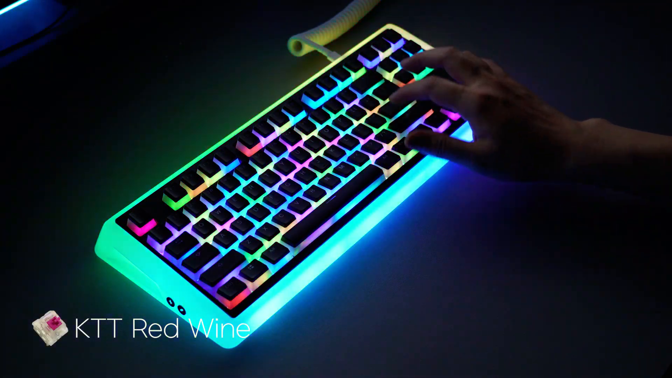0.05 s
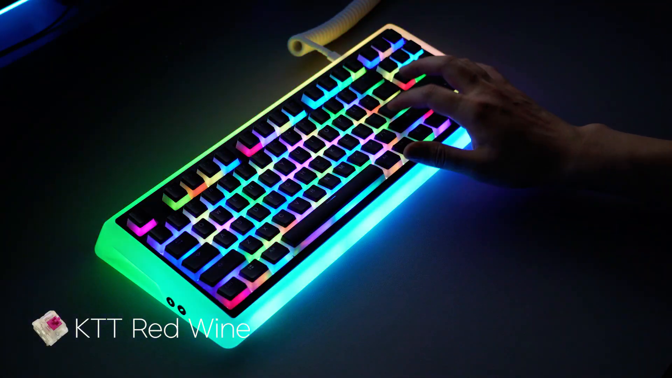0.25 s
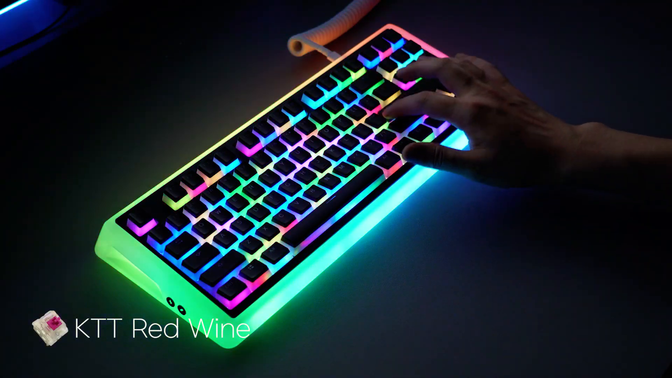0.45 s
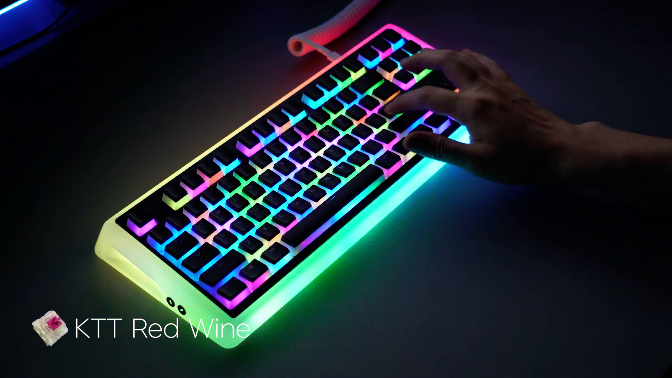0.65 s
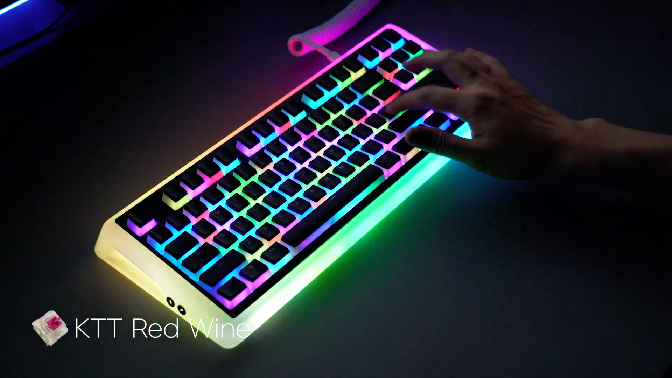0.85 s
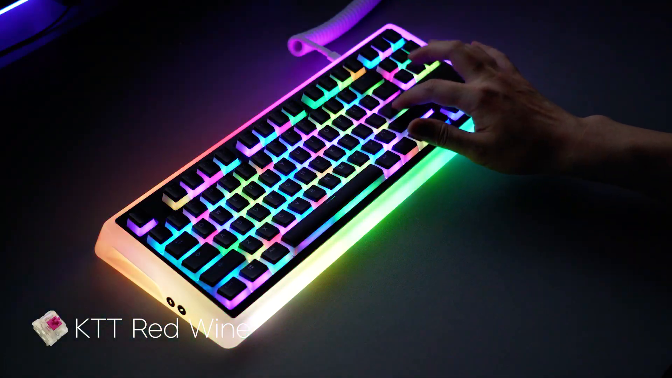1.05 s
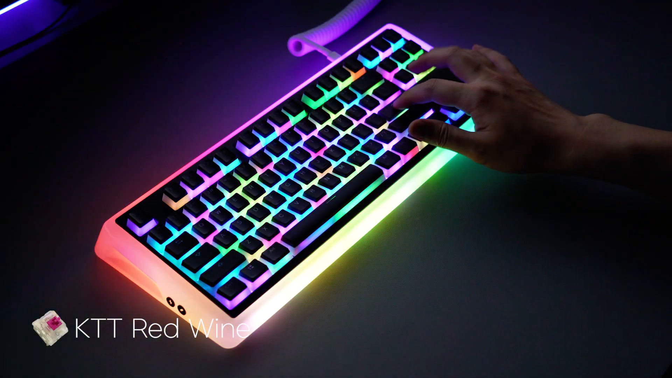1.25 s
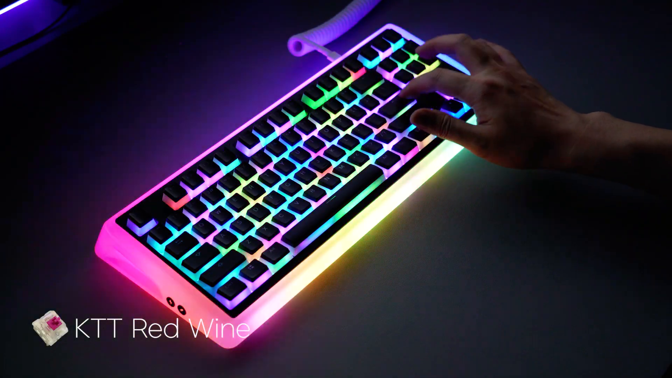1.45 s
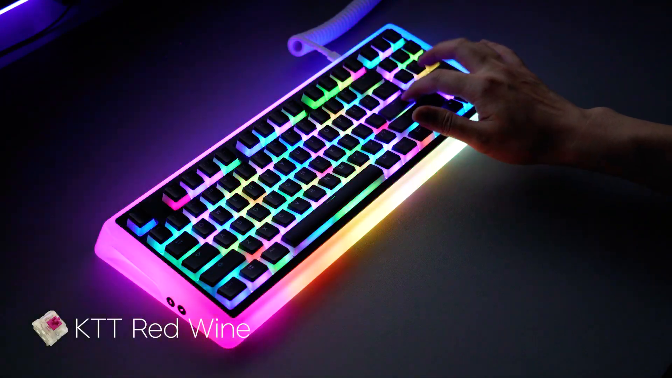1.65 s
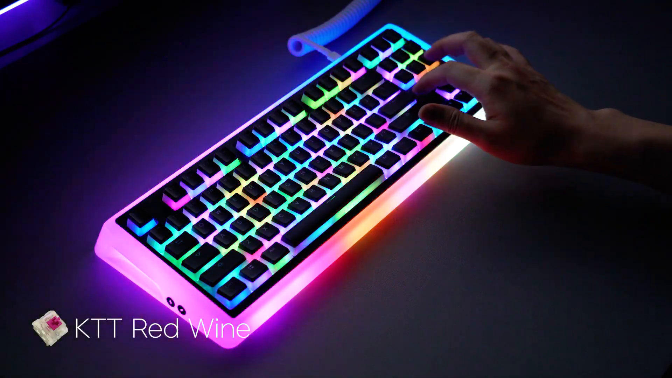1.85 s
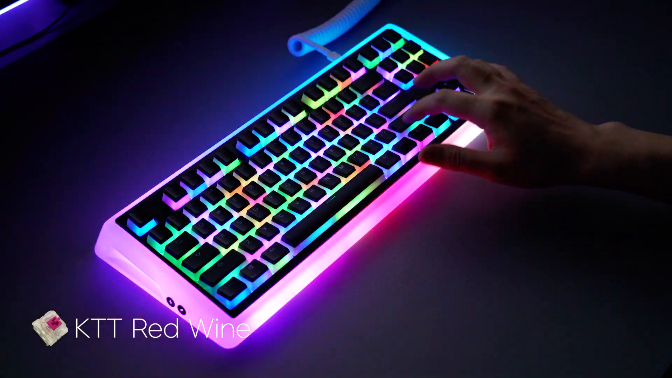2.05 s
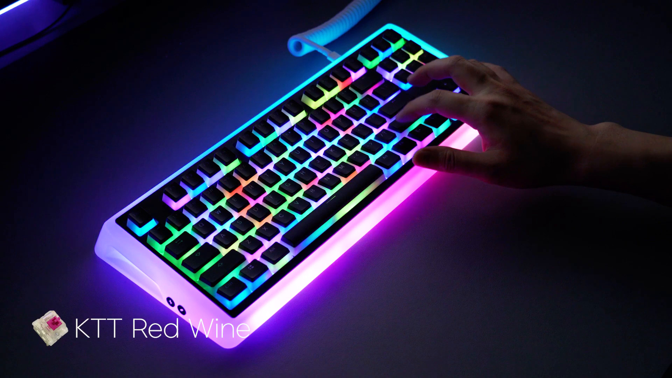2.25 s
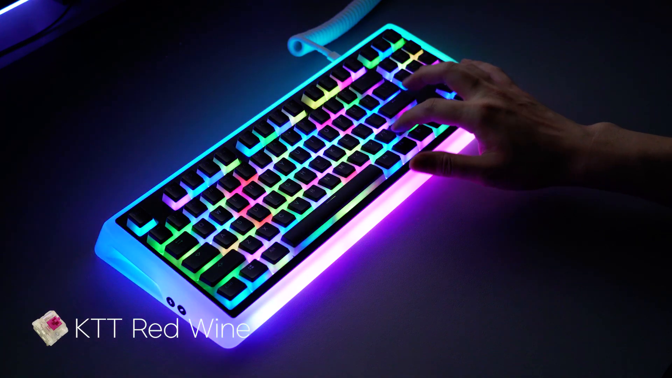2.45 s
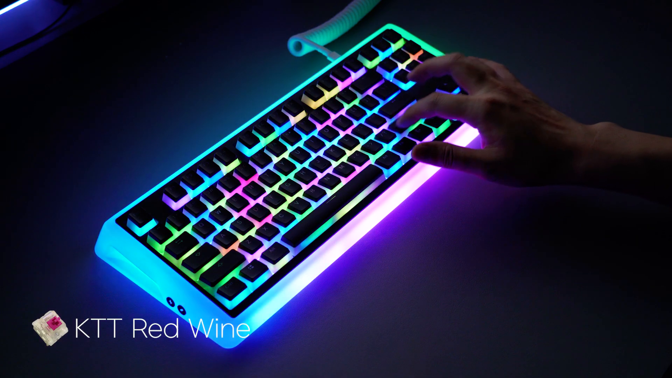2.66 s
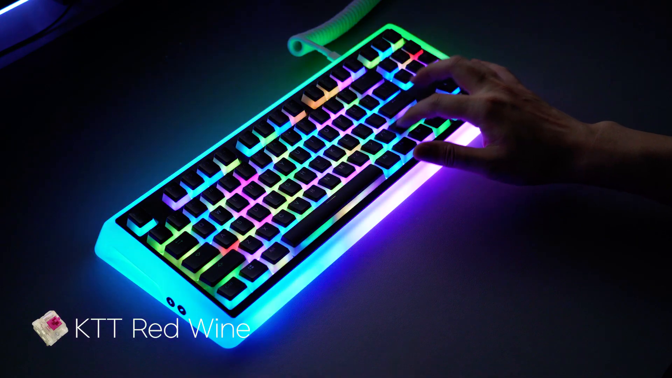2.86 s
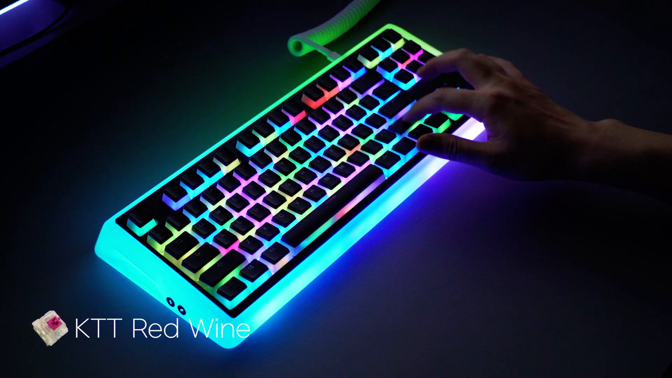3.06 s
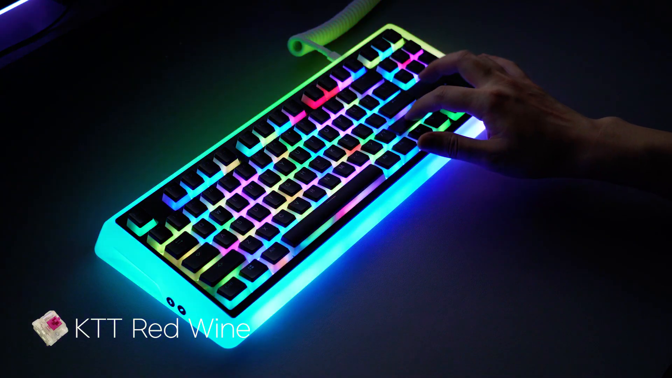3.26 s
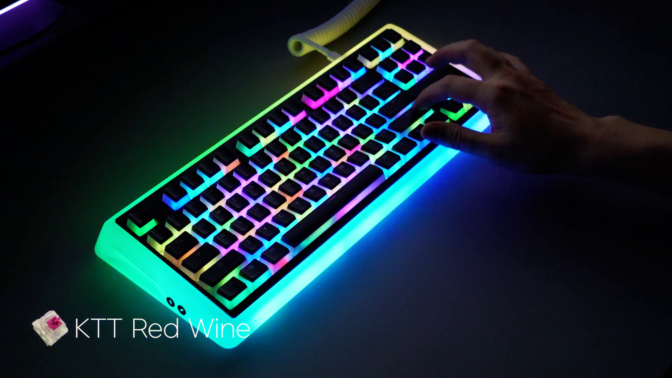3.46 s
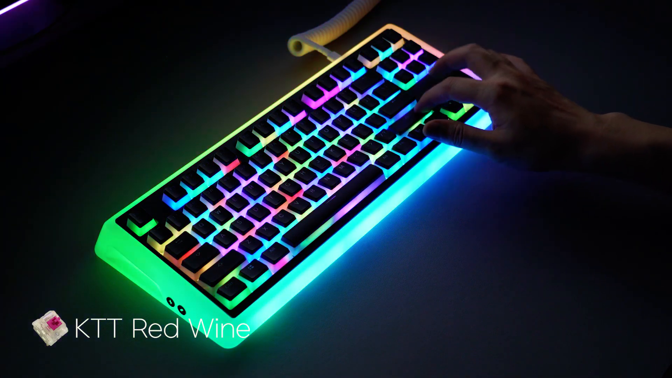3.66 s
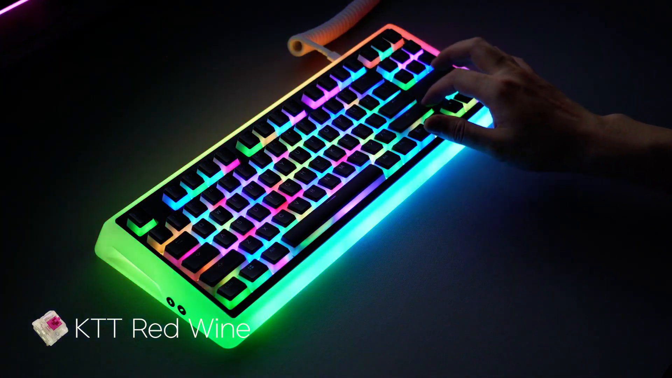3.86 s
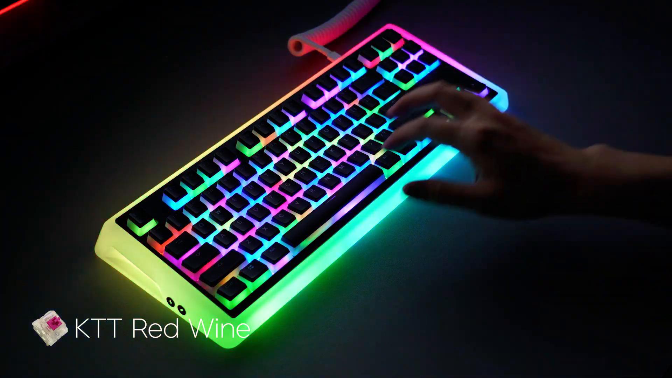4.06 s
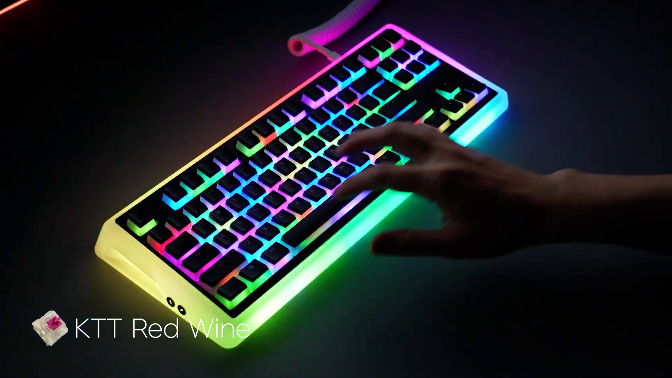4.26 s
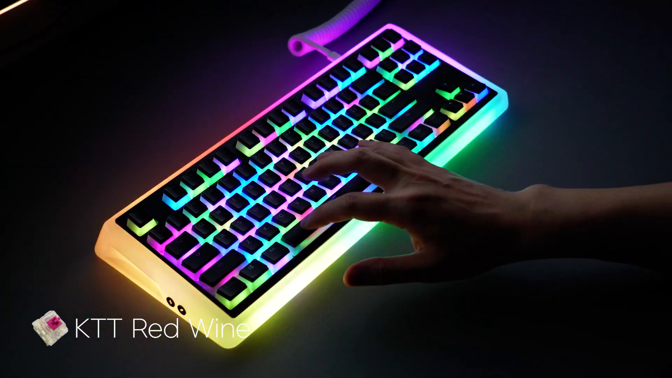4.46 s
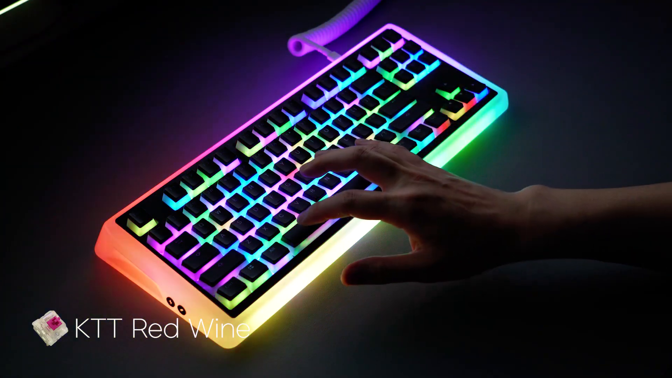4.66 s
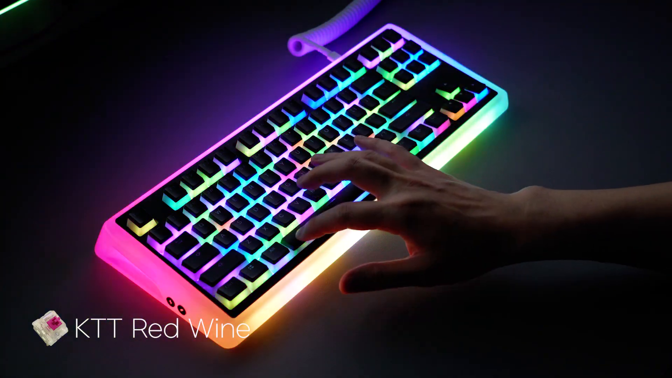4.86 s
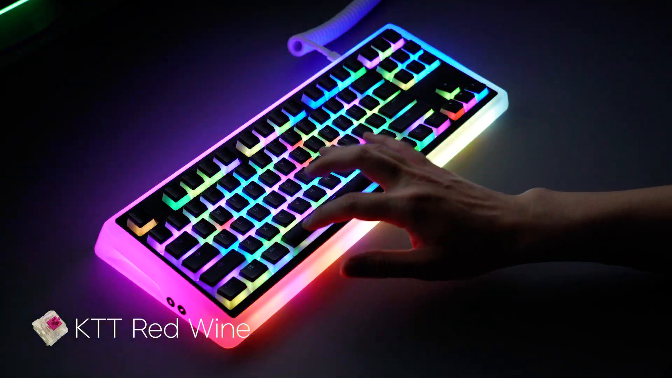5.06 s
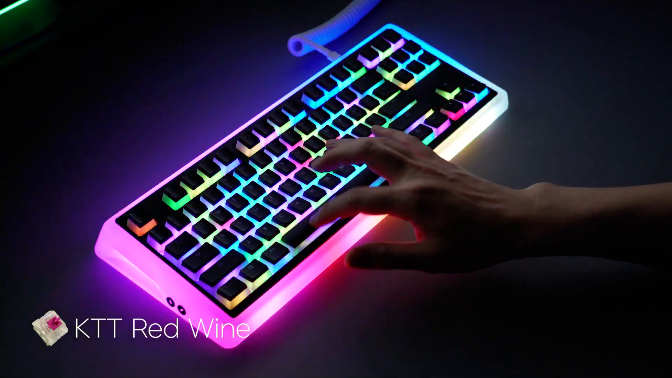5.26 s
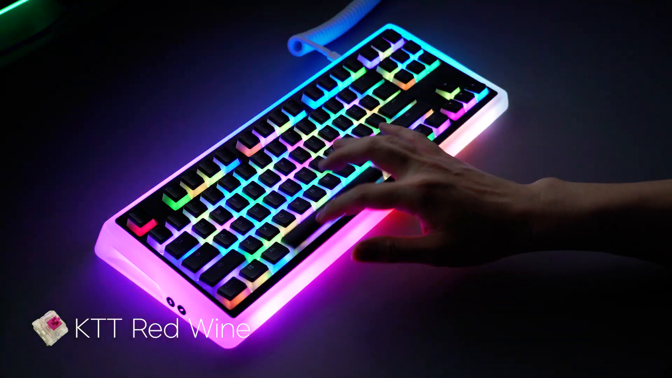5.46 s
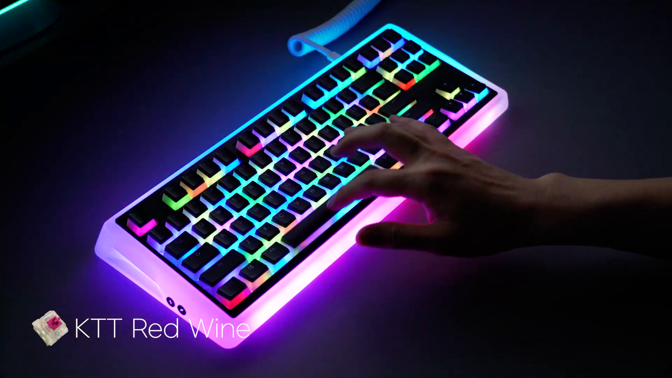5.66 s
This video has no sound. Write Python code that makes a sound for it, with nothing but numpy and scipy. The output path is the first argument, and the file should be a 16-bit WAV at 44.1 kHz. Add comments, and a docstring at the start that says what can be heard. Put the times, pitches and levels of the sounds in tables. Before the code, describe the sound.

A finger taps three mechanical keyboard keys in turn, quick even runs of crisp clacks with lighter return clicks, in a quiet room.

```python
"""Three keys tapped in turn

Close up in a quiet room, a finger taps three keys of a mechanical keyboard. In most taps a soft landing rustles;
in all, the stem scratches down, hits bottom, scratches back and hits the top, bouncing after each hit.
Hits ring damped modes that depend on the key; noise drives the desk thud, the slides and the room air.
Sparse taps answer as the room, and a few fading repeats as a flutter echo."""
import sys
import numpy as np
from scipy import signal
from scipy.fft import rfft, irfft
from scipy.io import wavfile
from scipy.ndimage import uniform_filter1d

SR = 44100
rng = np.random.default_rng(int(sys.argv[2]) if len(sys.argv) > 2 else 0)


def transcribe(u):
    """Save the signal u as a 16-bit wav file named by the first command-line argument.

    u: samples, shape (n,) or (channels, n), limited to [-1, 1]; the rate is SR.
    q: integer samples, one column per channel.
    """
    v = np.clip(np.atleast_2d(u).T, -1, 1)
    q = np.round(v * 32767).astype(np.int16)
    wavfile.write(sys.argv[1], SR, q)


N = 252252


def gain_of(db):
    """Amplitude factor of a level in dB."""
    return 10 ** (np.asarray(db) / 20)


def evened(x):
    """The signal scaled to an rms of 1."""
    return x / np.sqrt(np.mean(x ** 2) + 1e-20)


def read(points, hz):
    """A curve of (f/Hz, value) points, read along a log frequency axis."""
    f, value = np.transpose(points)
    return np.interp(np.log(hz + 1), np.log(f + 1), value)


def add(mix, s, sound):
    """Lay a sound into the mix from s seconds on."""
    part = mix[round(s * SR):][:len(sound)]
    part += sound[:len(part)]


# the finger goes to the next key: [t/s]
KEY_CHANGES = [2.2, 4.4]


def key_at(s):
    """Index of the key under the finger at s seconds."""
    return np.searchsorted(KEY_CHANGES, s)


# treble tilt of a usual blow, a row per key: [bottom, top, fingertip: tilt/dB per octave]
USUAL_TILT = [(-3.5, -3.3, 5.2), (-3, -1.2, 6), (-9, -9, 2.2)]
# peak of a usual blow: [bottom, top, fingertip: level/dB]
USUAL_DB = [-8, -15, -40]
# brightening with strength: [bottom, top, fingertip: dB per octave for each dB above usual]
BRIGHTENING = [0.4, 0.53, .3]


def hardness(key, kind, db):
    """Treble tilt in dB per octave: set by the key and the kind of blow, rising with its strength."""
    return USUAL_TILT[key][kind] + BRIGHTENING[kind] * (db - USUAL_DB[kind])


# modes of cap, switch and case, before extra damping and tilt:
# [f/Hz, t60/s, level/dB struck at the bottom, level/dB struck at the top]
FIRST_KEY_MODES = [(434, 0.071, -18, -1), (574, 0.064, -7.5, 7), (770, 0.0201, -6, -15),
                   (1030, 0.006, -4.5, 1.5), (1110, 0.06, 1, -2), (1570, 0.025, -14, -2),
                   (1862, 0.012, -10, 0), (1850, 0.019, 0, -15), (1846, 0.0041, -5.5, -28),
                   (2094, 0.042, -1.5, -18), (2320, 0.04, -19.5, -15.5), (2750, 0.02, -10, -3),
                   (3310, 0.21, -7, -17), (3660, 0.014, -43, -10), (4140, 0.007, -12.5, -35),
                   (4700, 0.014, -10.5, 1), (5280, 0.022, -5.5, -6), (5600, 0.0073, -9, -8),
                   (6750, 0.0074, -4.5, -14), (7000, 0.027, -1.5, -8), (7260, 0.019, -5.5, -4),
                   (8590, 0.0078, -14.5, -16), (9270, 0.0048, -11, -20.5), (10230, 0.014, -22, -29.5),
                   (11700, 0.0046, -22, -20), (13640, 0.0033, -18, -26), (14800, 0.012, -24.5, -32)]
SECOND_KEY_MODES = [(463, 0.047, -5, 7.5), (582, 0.097, -5.5, 5.5), (799, 0.038, 0.5, 8),
                    (954, 0.04, -1, 3.5), (1228, 0.0419, -11, -9), (1410, 0.0305, -16.5, 2.5),
                    (1476, 0.035, 0.5, -0.5), (1746, 0.087, 2, 2), (1820, 0.0048, -5.5, -11.5),
                    (1914, 0.1871, -3.5, 1), (2250, 0.011, -8, 3.5), (2250, 0.032, -6, 1),
                    (2810, 0.068, -21, -21), (3190, 0.038, -0.5, -0.5), (3335, 0.0068, -4, -23),
                    (3800, 0.006, -18, -36), (3867, 0.0048, -5.5, 0), (4680, 0.041, -2.5, 2),
                    (4600, 0.031, -17, -7), (5606, 0.004, -9, -16), (6760, 0.0055, -5.5, -22.5),
                    (7550, 0.037, -6, -20), (8900, 0.0035, -17, -28.5), (10460, 0.018, -8.5, -12.5),
                    (12960, 0.017, -14.5, -40.5), (14600, 0.011, -26.5, -36.5)]
THIRD_KEY_MODES = [(308, 0.05, -9, -8), (395, 0.45, -4.5, -3.5), (599, 0.071, -7, -4), (730, 0.096, -6, -4),
                   (1220, 0.01, -35, -4.5), (1332, 0.065, 0.5, -33), (1455, 0.031, 2.5, -0.5),
                   (1613, 0.028, 5, -5), (1723, 0.036, 4.5, -35), (1965, 0.053, 2, -27),
                   (2180, 0.015, -5, -10), (2230, 0.014, -1.5, -30), (2800, 0.016, -8, -6.5),
                   (3090, 0.035, 4, -33.5), (3064, 0.069, -30, 1.5), (3230, 0.026, -29, -38),
                   (3605, 0.031, -3, -13), (3760, 0.0103, -38, -48.5), (4570, 0.031, -40, -10),
                   (5480, 0.023, -5.5, -58), (5900, 0.046, -6.5, -24), (5960, 0.0088, -27, -41),
                   (6440, 0.02, -2, -8.5), (7840, 0.028, -35, -34), (9460, 0.0083, -6, -32),
                   (11400, 0.0086, -9, -40), (13100, 0.0085, -14, -47), (14100, 0.0059, -30, -38)]
# below this the case moves little air, per key: [f/Hz]
RADIATES_HZ = [387, 353, 270]
SIZE = 8192  # samples of the spectrum's period
LOSS = .014  # extra width of a mode as a share of its pitch: plastic damps the treble


def ring(key, end, hardness_db, dips=(), spread_db=0, damping_hz=0):
    """Causal response, peak 1, of a key's damped modes struck at the bottom (end 0) or the top (end 1)."""
    hz = np.fft.rfftfreq(SIZE, 1 / SR) + 1
    modes = [FIRST_KEY_MODES, SECOND_KEY_MODES, THIRD_KEY_MODES][key]
    f, t60, *struck_db = np.transpose(modes)[:, :, None]
    width = np.log(1000) / np.pi / t60 + LOSS * f + damping_hz
    strike_db = np.resize(spread_db, f.shape) * f / (f + 3000)  # low modes hardly care where they are struck
    level = gain_of(struck_db[end] + strike_db)
    power = (level ** 2 / (1 + ((hz - f ** 2 / hz) / width) ** 2)).sum(0)
    for dip_hz, dip_width, depth_db in dips:
        away = ((hz - dip_hz ** 2 / hz) / dip_width) ** 2
        power = power * (away + gain_of(depth_db) ** 2) / (away + 1)
    power = power / (1 + (RADIATES_HZ[key] / hz) ** 2) ** 2
    power = power / (1 + (hz / 3000) ** 2)  # the contact is short but not instant
    power = power * gain_of(hardness_db * np.log2(1 + hz / 2000)) ** 2

    # minimum phase from the log gain, so that nothing sounds before the blow
    folded = irfft(np.log(power + 1e-14)) * (np.arange(SIZE) <= SIZE // 2)
    folded[0] /= 2
    response = irfft(np.exp(rfft(folded)))[:SIZE // 2]
    return response / abs(response).max()


# spectral shape of the room air: [f/Hz, relative level/dB per Hz]
AIR_SHAPE = [(15, -52.5), (25, -13), (92, -20), (123, 1.5), (170, -17), (242, -4.5), (270, -16),
             (309, -1.5), (394, -20), (427, -10.5), (775, -20), (1230, -24.5), (2000, -36), (4490, -42.5),
             (16000, -53)]
# the air around 290 Hz wavers, with one brief swell: [t/s, level/dB]
LOW_SWELL = [(0, -0.5), (3.95, 4), (4.099, 2.5), (4.18, 5.5), (4.242, -2), (4.31, 12), (4.42, -2),
             (5.72, 7.5)]
AIR_DB = -64  # rms of the air


def air():
    """Room noise: random spectral frames under a steady shape, with drifting patches and a wavering low band."""
    frames, hz = N // 512 + 5, np.fft.rfftfreq(2048, 1 / SR)
    real, imaginary, patches = rng.standard_normal((frames, 1025, 3)).T
    patches = uniform_filter1d(uniform_filter1d(patches, 4, 0), 8, 1)
    patches_db = 1.5 * evened(patches)
    swell_db = np.interp(np.arange(frames) * 512 / SR, *np.transpose(LOW_SWELL))
    low_band = np.exp(-(np.log((hz + 1) / 290) / 0.49) ** 2)[:, None]
    level_db = read(AIR_SHAPE, hz)[:, None] + patches_db + swell_db * low_band
    spectra = (real + 1j * imaginary) * gain_of(level_db)
    noise = signal.istft(spectra, nperseg=2048, noverlap=1536)[1][:N]
    return gain_of(AIR_DB) * evened(noise)


# the strokes down and up: [travel time/s, power law of the speed-up]
STROKES = [(.032, 2.3), (0.018, .6)]
# scratch drive before the grit colour, a row per key: [down level/dB, up level/dB]
SLIDE_DB = [(-58.5, -59.5), (-57.5, -55), (-55.5, -56)]
# colour of the grit: [f/Hz, level/dB]
GRIT_COLOUR = [(300, -6), (1500, -3.5), (3000, 5.5), (5000, 12), (8000, 8), (12000, 16), (16000, 6)]


def slides():
    """The stem scratches its housing: uneven noise that grows with its speed until it hits an end of its travel."""
    t, out = np.arange(N) / SR, np.zeros(N)
    speed = np.zeros((3, N))
    for end, (rows, (travel, law)) in enumerate(zip((PRESSES, RELEASES), STROKES)):
        for s, _ in rows:
            key = key_at(s)
            run_up = np.clip(1 + (t - s) / travel, 0, 1) ** law * (t < s)
            speed[key] += gain_of(SLIDE_DB[key][end]) * run_up
    uneven_db = 2.5 * evened(uniform_filter1d(rng.standard_normal(N), size=100))
    grit = rng.standard_normal(N) * gain_of(uneven_db)
    for key, stroke in enumerate(speed):
        body = ring(key, 0, 0, damping_hz=402.0)
        out += signal.oaconvolve(grit * stroke, body / np.linalg.norm(body))[:N]
    colour = gain_of(read(GRIT_COLOUR, np.fft.rfftfreq(N, 1 / SR)))
    return irfft(rfft(out) * colour, N)


# the fingertip lands on the cap: [t/s, peak level/dB]
TOUCHES = [(0.46, -34.5), (0.591, -39), (0.714, -41.5), (0.856, -38), (0.993, -40.5), (1.125, -46),
           (1.257, -46), (1.524, -44.5), (2.448, -30.5), (2.584, -43), (2.719, -37.5), (2.853, -38),
           (2.998, -35), (3.123, -37.5), (3.264, -34), (3.401, -35), (3.536, -35.5), (3.663, -43),
           (3.792, -41), (4.892, -34), (5.027, -42.5), (5.166, -41.5), (5.308, -38), (5.443, -39),
           (5.589, -36)]


def touches():
    """A soft fingertip gives a short rustle through the damped cap, then rubs on as it pushes."""
    out, t = np.zeros(N), np.arange(1300) / SR
    landing = gain_of(-60 * t / 0.015)
    rubbing = gain_of(-12.0 - 60 * t / 0.18)
    for s, db in TOUCHES:
        key = key_at(s)
        rustle = rng.standard_normal(len(t)) * (landing + rubbing)
        sound = np.convolve(rustle, ring(key, 1, hardness(key, 2, db), damping_hz=200.))
        add(out, s, gain_of(db) * sound / abs(sound).max())
    return out


# the stem hits bottom: [t/s, peak level/dB before bounces]
PRESSES = [(0.485, -11.5), (0.626, -10), (0.7503, -9), (0.8849, -8.5), (1.0195, -7), (1.1531, -7),
           (1.283, -7), (1.4199, -6.5), (1.5568, -6.5), (1.68, -4.5), (1.8116, -4.5), (2.4654, -11),
           (2.605, -9.5), (2.7397, -6.5), (2.8743, -8), (3.0205, -9.5), (3.1448, -6), (3.2855, -8),
           (3.4256, -10), (3.5586, -9), (3.6911, -10.0), (3.8209, -10.5), (4.917, -3.5), (5.0624, -1.5),
           (5.2038, -4), (5.3403, -3.5), (5.4707, -1), (5.617, -3.5)]
# the stem springs back to the top: [t/s, peak level/dB before bounces]
RELEASES = [(0.5472, -15.5), (0.6829, -16.5), (0.8069, -14.5), (0.9363, -14.5), (1.0748, -15),
            (1.2098, -16), (1.349, -15.5), (1.4795, -16), (1.6206, -18.5), (1.7434, -15.5), (1.8788, -21.5),
            (2.5356, -18.5), (2.6703, -16), (2.8067, -18.5), (2.942, -16.5), (3.0791, -17.5), (3.212, -16),
            (3.3493, -13.5), (3.4876, -13.5), (3.6294, -19), (3.7605, -17.5), (3.8942, -21), (4.9821, -17),
            (5.1222, -15), (5.2552, -14.5), (5.3997, -13.5), (5.5306, -10), (5.6734, -11)]
# where neighbouring modes cancel on the way to the microphone, a list per key:
# [f/Hz, width/Hz, level/dB at the centre (above 0 lifts)]
DIPS = [
    [(691, 180, -18.5), (1572, 190, -5), (5920, 180, -20.5)],
    [(851, 110, -23), (1272, 57, -20), (4085, 450, -9.5), (6580, 360, 1)],
    [(892, 800, -38), (2550, 180, -6), (4260, 1260, -35)],
]
# usual first bounce of the stem, a row per key:
# [t/s after the bottom hit, level/dB from its peak, t/s after the top hit, level/dB from its peak]
BOUNCES = [(.003, -18, .0025, -5.5), (.0031, -14, 0.002032, -4), (0.0022, -14.5, 0.007, -11.5)]
# noise drive of the chatter, a row for bottom and top: [high treble level/dB, low treble level/dB, t60/s]
CHATTER = [(-19.5, -18, 0.0061), (-12.5, -14, 0.0098)]


def hits(rows, end):
    """Each hit rings its key, chatters in the treble, and rings again, duller, as the stem bounces twice.
    Gives the sound towards the microphone and the sound sent all round, which has no dips and wider peaks."""
    out, t = np.zeros((2, N)), np.arange(400) / SR
    high_db, low_db, t60 = CHATTER[end]
    push = 2 * end - 1  # the blow pushes down at the bottom, up at the top
    for s, db in rows:
        key = key_at(s)
        hardness_db = hardness(key, end, db)
        timing, strength = rng.standard_normal(2)
        spread_db = 1.3 * rng.standard_normal(30)  # no two blows land on quite the same spot
        noise = rng.standard_normal(len(t))
        high = np.diff(noise, 2, prepend=[0, 0])
        low = np.diff(noise[::-1], prepend=0)
        chatter = (gain_of(high_db) * high + gain_of(low_db) * low) * gain_of(-60 * t / t60)
        chatter[0] = 1  # the blow itself
        after, bounce_db = BOUNCES[key][2 * end:2 * end + 2]
        after = after * (1 + .04 * (1 + 2 * end) * timing)  # less regular at the top
        bounce_db = bounce_db + 2 * strength
        for path, dips, blur_hz in zip(out, (DIPS[key], []), (15., 150.)):
            sound = np.convolve(chatter, ring(key, end, hardness_db, dips, spread_db, damping_hz=blur_hz))
            add(path, s, push * gain_of(db) * sound / abs(sound).max())
            bounce = ring(key, end, hardness_db - 2.5, dips, spread_db[::-1], damping_hz=59.0)
            bounce = gain_of(bounce_db) * bounce
            for turn in (1, 1.55):  # the second bounce is lower
                add(path, s + turn * after, push * gain_of(db - 9.2 * (turn - 1)) * bounce)
    return out


# modes of the desk top: [f/Hz, width/Hz, level/dB before the width scales it]
DESK_MODES = [(30, 30, -59.5), (71.2, 47, -60), (118, 16, -55), (260.3, 55, -58)]


def desk():
    """Presses and releases shake the desk top: uneven rumble in a few low, wide modes."""
    shake, t = np.zeros(N), np.arange(SR // 4) / SR
    for s, db in PRESSES + RELEASES:
        add(shake, s, gain_of(.7 * db - 60 * t / .2) * (1 - np.exp(-t / 0.0078)))
    hz, drive = np.fft.rfftfreq(N, 1 / SR), rfft(shake * rng.standard_normal(N))
    shape = np.zeros(len(hz))
    for f, width, db in DESK_MODES:
        shape += gain_of(db) * np.sqrt(SR / width) / (1 + ((hz - f) / width) ** 2)
    return irfft(drive * shape, N)


# decay of the room by band: [f/Hz, t60/s, relative level/dB]
ROOM_BANDS = [(246, 0.51, 4.5), (592, 0.05, -4), (1200, 0.11, 1), (2500, 0.16, 1.5), (4320, 0.11, 2),
              (6880, 0.14, 2), (10000, 0.23, -7), (14000, 0.1, 0)]


def room(x):
    """The room answers with sparse taps of random sign, each band dying at its own speed."""
    taps = np.zeros(SR // 2)
    at = np.arange(120, len(taps) - 20, 20)
    taps[at + rng.integers(0, 20, len(at))] = rng.choice([-1., 1.], len(at))
    hz, t, spectra = signal.stft(taps, SR, nperseg=128)
    bands = np.array(ROOM_BANDS)
    t60 = read(bands[:, [0, 1]], hz)[:, None]
    db = read(bands[:, [0, 2]], hz)[:, None]
    tail = signal.istft(spectra * gain_of(db - 60 * t / t60), SR, nperseg=128)[1]
    return signal.oaconvolve(x, tail / np.linalg.norm(tail))[:N]


# the band that the echo keeps: [low f/Hz, high f/Hz]
ECHO_BAND = (1800, 9000)
FLUTTER_S, FLUTTER_DB, FLUTTER_LOSS_DB = .0096, -21.5, -7  # period, first return, change per trip


def echoes(x):
    """The sound runs to and fro between two hard surfaces and returns four times, weaker each time."""
    taps = np.zeros(SR // 20)
    for trip in range(4):
        taps[round((trip + 1) * FLUTTER_S * SR)] = gain_of(FLUTTER_DB + trip * FLUTTER_LOSS_DB)
    returns = signal.oaconvolve(x, taps)[:N]
    return signal.lfilter(*signal.butter(2, ECHO_BAND, "band", fs=SR), returns)


def scene():
    """Mix the taps with their echoes, the room's answer, the desk and the air."""
    direct, all_round = hits(PRESSES, 0) + hits(RELEASES, 1) + touches() + slides()
    mix = direct + echoes(direct) + gain_of(-17.5) * room(all_round) + desk() + air()
    return mix[None]


def record(dry):
    """The loudest peaks are clipped; then a steep low-pass limits the band."""
    clipped = np.clip(dry, -.54, .54)
    low_pass = signal.firwin(511, 16700, window=("kaiser", 9), fs=SR)  # edge in Hz
    return signal.oaconvolve(clipped, low_pass[None], "same")


dry = scene()
out = record(dry)
transcribe(out)
```